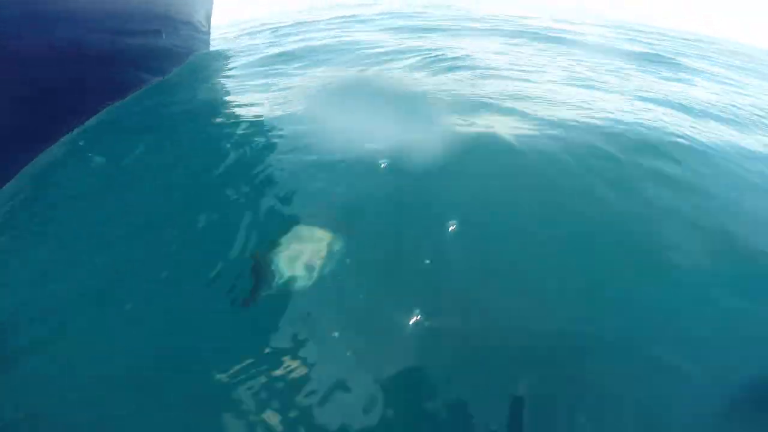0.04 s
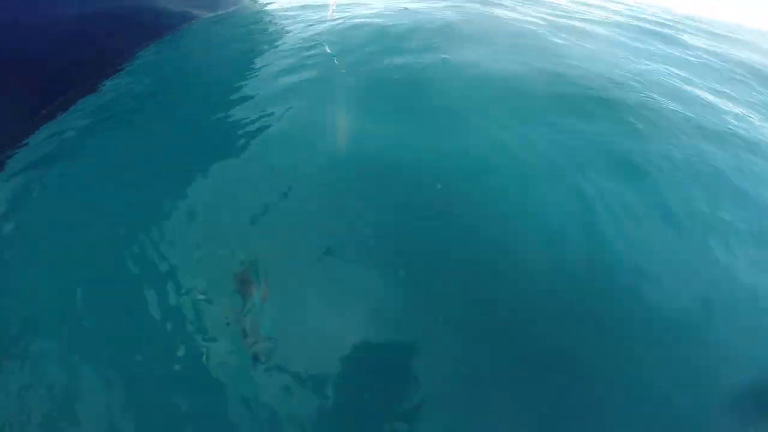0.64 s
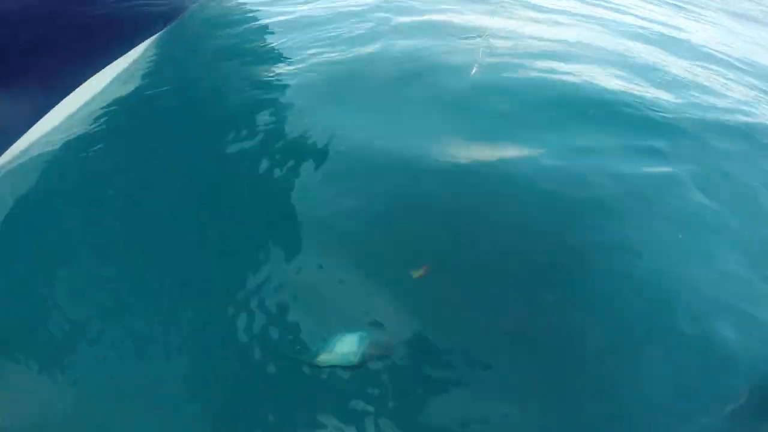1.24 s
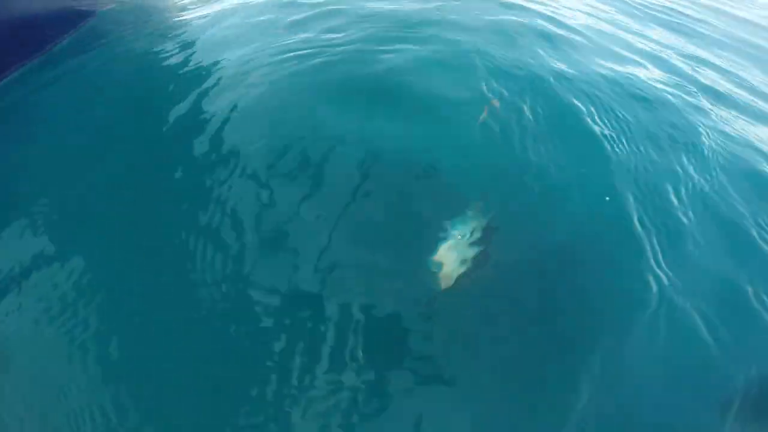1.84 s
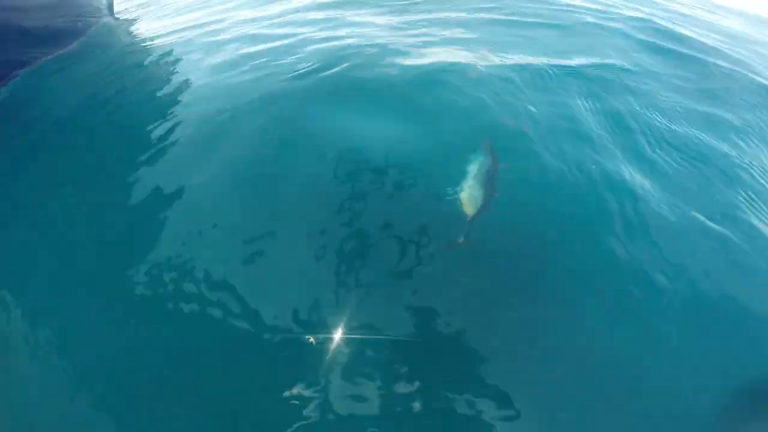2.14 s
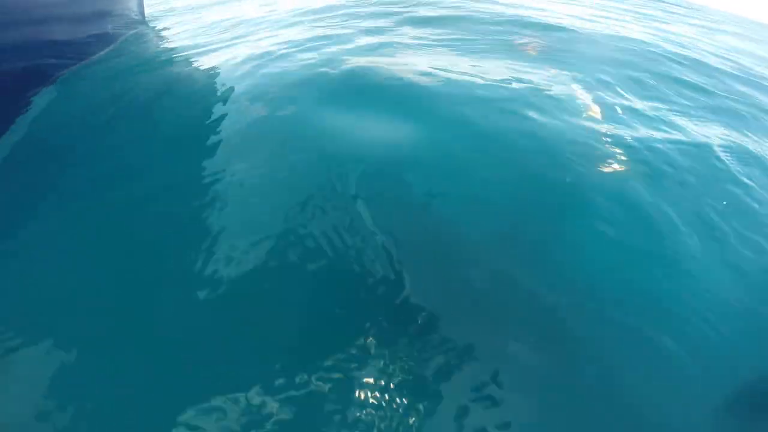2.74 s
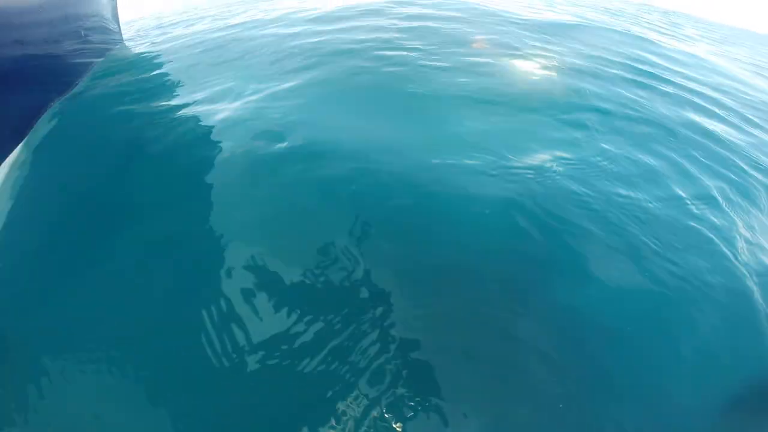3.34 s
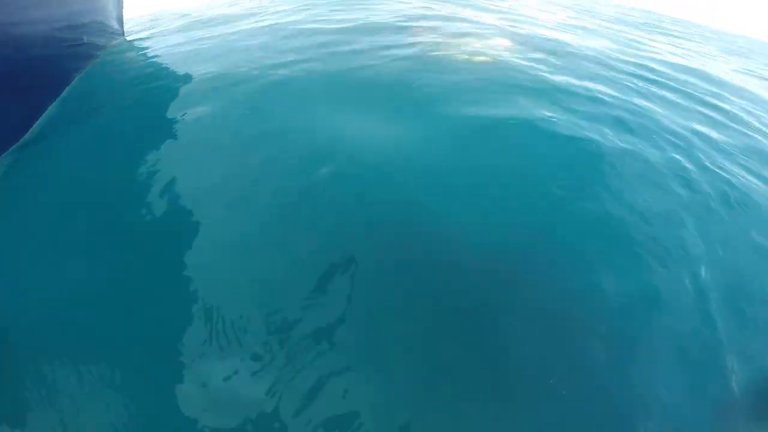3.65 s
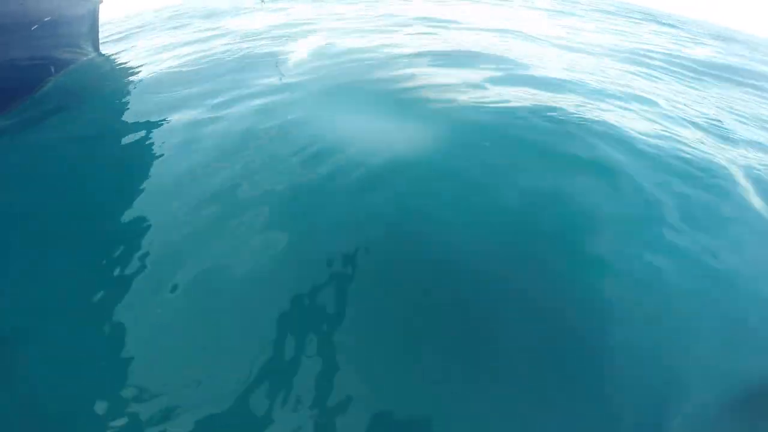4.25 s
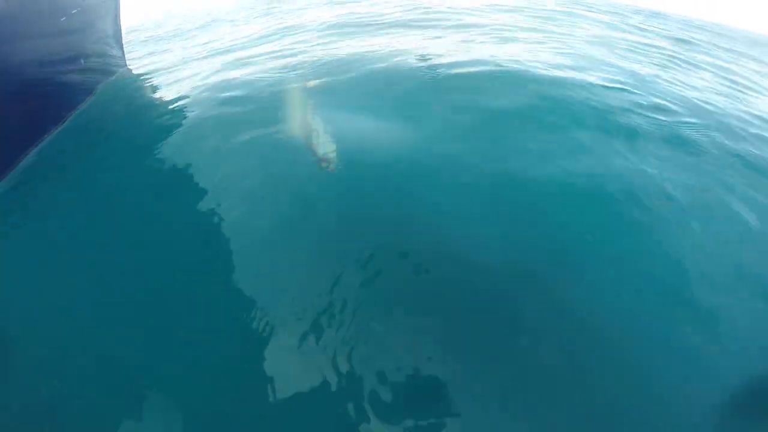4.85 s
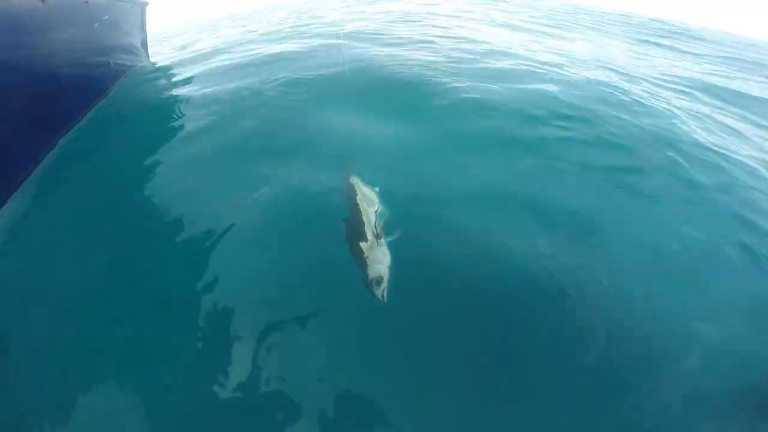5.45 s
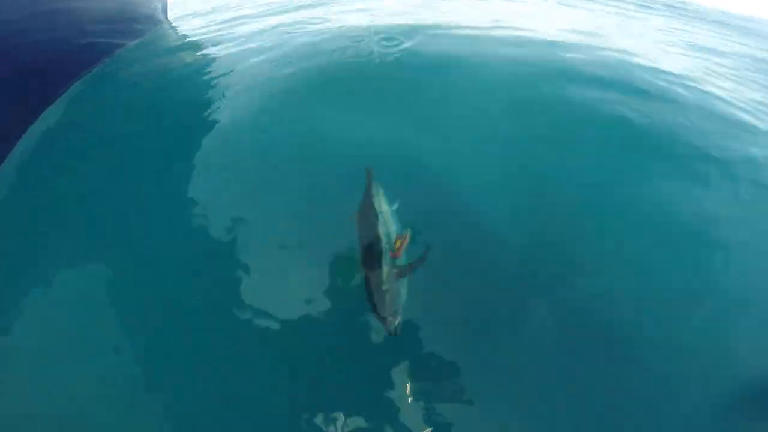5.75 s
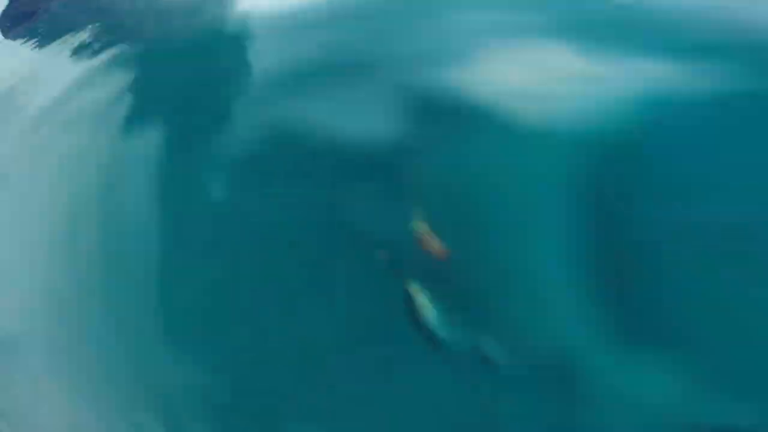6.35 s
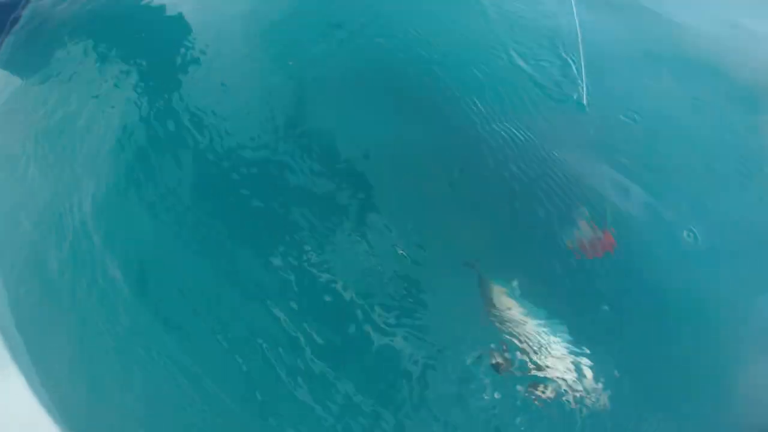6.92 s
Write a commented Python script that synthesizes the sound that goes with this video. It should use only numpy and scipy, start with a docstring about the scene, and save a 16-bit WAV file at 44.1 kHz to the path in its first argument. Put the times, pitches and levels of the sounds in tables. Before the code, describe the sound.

Quiet, muffled water washes against a drifting boat over a low, swelling rumble, with scattered small bubble plips. About a third of the way in, one loud, sharp knock hits the waterproof case around the microphone. The wash carries on, and near the end a fish makes a brief splash, a soft thud with drops ticking on the case. A very faint electronic whine sits underneath.

```python
"""A waterproof camera beside a drifting boat

The camera is held on a pole over the side, where a hooked fish is drawn up. The sea passes through
the case as a dull wash and rumble, with the plips of resonating bubbles; the electronics whine faintly.
One hard knock excites the modes of the mount and makes the gain control duck. Near the end the fish
throws spray, whose drops tick on the case."""
import sys
import numpy as np
from scipy import signal
from scipy.fft import rfft, irfft
from scipy.io import wavfile
from scipy.ndimage import uniform_filter1d, minimum_filter1d

SR = 44100
rng = np.random.default_rng(int(sys.argv[2]) if len(sys.argv) > 2 else 0)


def master_out(mix):
    """Clip the mix to full scale and print it as 16-bit PCM to the path in sys.argv[1]."""
    frames = np.transpose(np.atleast_2d(mix))
    ceiling = np.clip(frames, -1, 1)
    pcm = np.round(ceiling * 32767).astype(np.int16)
    wavfile.write(sys.argv[1], SR, pcm)


N = 312228
TIME = np.arange(N) / SR

# rumble from the slow rocking of boat and pole, with a lull in the middle: t/s, level/dB
SWELL = [(0, -50.5), (2.4, -50), (3.6, -52.5), (4.5, -52.5), (5.4, -46), (6.2, -44.5), (7.08, -46.5)]
# rumble from single waves that heave the pole: crest t/s, level/dB
WAVE_CRESTS = [(.14, -41), (.78, -41.5), (1.17, -44.5), (1.41, -46), (1.83, -41.5), (2.12, -46),
               (2.41, -40.5), (3.4, -47.5), (4.69, -45.5), (5.39, -44)]
# spectral densities of the noises of sea and electronics: f/Hz, relative level/dB
RUMBLE_SPECTRUM = [(8, -15), (18, -10), (32, 1), (43, -8), (53, 0.5), (69, -4), (82, -21), (130, -38)]
SLOSH_SPECTRUM = [(60, -21.5), (95, 1.5), (125, 0.5), (152, -0.5), (200, -9), (300, -14), (600, -35)]
WASH_SPECTRUM = [(80, -5.5), (200, 3), (330, 1.5), (600, -2), (1100, -5.5), (1600, -8), (2100, -9.5),
                 (2800, -10.5), (4200, -15), (6200, -18), (8500, -24), (11800, -25), (13500, -31),
                 (15300, -35.5)]
FIZZ_SPECTRUM = [(4000, -25), (7300, -1.5), (8500, -7), (9200, 4.5), (10200, -12), (12000, -3.5),
                 (15200, -13)]
# partials of the power supply's whine: f/Hz, rms level/dB, wander/Hz
WHINE_PARTIALS = [(2925, -85, 20), (5850, -78, 40), (8781, -83, 4), (11719, -77, 14), (14625, -84, 3)]
# spells of electronic fizz: start t/s, end t/s
FIZZ_SPELLS = [(.003, 0.77), (2.339, 2.55), (3.025, 5.1), (6.735, 7.07)]
# the clearest bubbles at the hull: t/s, level/dB, f/Hz, t60/s
BUBBLES = [(.721, -52, 2650, .027), (.722, -55, 4750, .03), (.789, -47, 4720, .04), (.805, -52, 4240, .04),
           (.808, -50, 2570, .036), (.83, -54.5, 1530, .11), (1.305, -56, 1600, .14),
           (1.491, -44.5, 2380, .021), (1.995, -51.5, 1510, .13), (4.054, -53, 5870, .012),
           (4.055, -50, 3300, .012), (4.565, -55, 1525, .1), (4.689, -40, 2470, 0.027),
           (4.692, -52, 5100, .046), (4.699, -44.5, 2720, .034), (5.222, -40, 148, .13),
           (5.372, -48, 2730, .027), (5.394, -42, 1610, 0.043), (5.446, -54, 4600, .017),
           (5.487, -50, 2410, .027), (5.829, -49.5, 2250, .02), (5.847, -49, 1770, 0.023),
           (5.866, -50, 2400, .015), (6.971, -54, 2760, .2)]
# electronic chirps: t/s, fundamental f/Hz
CHIRPS = [(1.005, 3260), (1.405, 3330), (5.245, 3310), (5.712, 3310)]
# harmonics of a chirp: harmonic number, rms level/dB
CHIRP_HARMONICS = [(1, -78), (2, -71.5), (3, -74.5), (4, -78)]
# the knock and its rebounds: t/s, level/dB
BLOWS = [(2.467, 16), (2.4878, -17), (2.4928, -15), (2.5045, -19)]
# modes of case and pole: f/Hz, relative level/dB, t60/s
MOUNT_MODES = [(51, -23, .24), (64.5, -22.5, .53), (115, -30.5, .6), (126, -19, .11), (161, -21, 0.15),
               (213, -35, .043), (289, -25, .13), (424, -35, .12), (469.8, -31, .12), (583, -22.5, .064),
               (680, -26.5, 0.048), (837, -17, .07), (1031, -9, .041), (1132, -20, .066), (1250, -22, .045),
               (1440, -8, .046), (1600, -15, .024), (1790, -14.5, .028), (1990, -12.5, .022),
               (2334, -24, .03), (2510, -21.5, .028), (2950, -22, .018), (3450, -21, .016)]
# heavily damped modes, the dry crack of the contact: f/Hz, relative level/dB, t60/s
CRACK_MODES = [(1470, 0, .0074), (2100, -12.5, .006), (3600, -17, .0044)]
# crowded small modes of the case, a dying clatter: low f/Hz, high f/Hz, relative level/dB, t60/s
CLATTER_BANDS = [(168.9, 700, -25, .085), (750, 1250, -26, .06), (1250, 2100, -23.5, .036),
                 (2100, 2900, -28.5, .036), (2900, 3700, -32, .026), (3700, 6800, -32.5, .014),
                 (7000, 14000, -30.5, .006)]
# drops striking the case: t/s, tick level/dB, tick f/Hz, tick t60/s, click level/dB
DROPS = [(6.3922, -45, 4000, .005, -44), (6.401, -29.5, 2030, .0068, -37), (6.4053, -34, 6300, .005, -28.5),
         (6.4104, -15.5, 6500, 0.007, -29), (6.4421, -17.5, 11700, 0.0034, -28),
         (6.4678, -26, 6100, .0039, -31), (6.476, -43, 5500, .008, -41), (6.4905, -26.5, 4040, .0068, -31),
         (6.57, -28, 11500, 0.0018, -39.5), (6.5837, -51, 3800, .005, -40), (6.606, -48, 3700, .014, -50)]


def from_db(db):
    """Decibels to amplitude ratio."""
    return 10 ** (np.asarray(db) / 20)


def rms_one(x):
    """Normalisation to rms 1."""
    return x / np.sqrt(np.mean(x ** 2) + 1e-20)


def noise(spectrum):
    """White noise filtered to a given spectral density, rms 1."""
    hz, level_db = np.transpose(spectrum)
    log_hz = np.log(np.maximum(np.fft.rfftfreq(N, 1 / SR), 1))
    shape = from_db(np.interp(log_hz, np.log(hz), level_db, left=-np.inf, right=-np.inf))
    return rms_one(irfft(rfft(rng.standard_normal(N)) * shape, N))


def drift(rate):
    """Random fluctuation of spread about 1, interpolated between `rate` values a second."""
    steps = rng.standard_normal(N // 20)
    return np.interp(TIME * rate, np.arange(len(steps)), steps)


def ring(force, hz, t60):
    """A damped harmonic oscillator: a unit impulse starts a sine of amplitude 1."""
    r, w = from_db(-60 / (t60 * SR)), 2 * np.pi * hz / SR
    return signal.lfilter([0, np.sin(w)], [1, -2 * r * np.cos(w), r * r], force + 1e-18)


def band(x, low_hz, high_hz, order=2):
    """Causal band-pass filter."""
    edges_hz = [low_hz, min(high_hz, SR / 2 - 1)]
    return signal.sosfilt(signal.butter(order, edges_hz, "band", fs=SR, output="sos"), x)


def add(out, s, sound):
    """Superposition of a sound starting at time s."""
    i = round(s * SR)
    out[i:i + len(sound)] += sound[:N - i]


def burst(low_hz, high_hz, t60, order=2):
    """Exponentially decaying band noise, with the energy of a damped sine of amplitude 1."""
    fade = from_db(-60 * TIME[:SR // 8] / t60)
    x = band(rng.choice([-1, 1], len(fade)) * fade, low_hz, high_hz, order=order)
    return x * np.sqrt(np.sum(fade ** 2) / 2 / np.sum(x ** 2))


def sea(rise_s=.11, fall_s=.21, slosh_db=-63, wash_db=-58.5):
    """Swell and waves shake the pole and add in power; slosh and wash on the hull grow a little too."""
    power = from_db(np.interp(TIME, *np.transpose(SWELL))) ** 2
    for s, db in WAVE_CRESTS:
        heave = np.interp(TIME - s, [-rise_s, 0, fall_s], [0, 1, 0])
        power += (from_db(db) * heave) ** 2
    motion_db = 10 * np.log10(power / power.mean())
    rumble = noise(RUMBLE_SPECTRUM)
    rumble /= np.sqrt(uniform_filter1d(rumble ** 2, size=SR // 8))   # the sea alone sets its slow level
    slosh = from_db(slosh_db + .12 * motion_db + 3.5 * drift(27)) * noise(SLOSH_SPECTRUM)
    wash = from_db(wash_db + .08 * motion_db + .5 * drift(12)) * noise(WASH_SPECTRUM)
    return np.sqrt(power) * rumble + slosh + wash


def gurgle(centre_hz=1600, half_width_hz=170, level_db=-77, swing_db=4):
    """A resonance of the case acts as a band-pass filter on faint, fluctuating water noise."""
    resonance = band(rng.standard_normal(N), centre_hz - half_width_hz, centre_hz + half_width_hz)
    return from_db(level_db + swing_db * np.tanh(drift(24))) * rms_one(resonance)


def whine():
    """The power supply oscillates in nearly harmonic partials, each with random frequency modulation."""
    out = np.zeros(N)
    for hz, db, wander_hz in WHINE_PARTIALS:
        phase = 2 * np.pi * np.cumsum(hz + wander_hz * drift(200)) / SR
        out += from_db(db) * np.sqrt(2) * np.sin(phase)
    return out


def fizz(every_s=.141, jitter_s=.008, length_s=.041, level_db=-71, vary_db=1.1, rasp_hz=140, rasp_db=3.5):
    """Under changing load the supply hisses in nearly regular bursts; amplitude modulation adds a rasp."""
    gate, window = np.zeros(N), signal.windows.tukey(int(length_s * SR), .3)
    for start, end in FIZZ_SPELLS:
        for s in np.arange(start, end, every_s):
            late_s, strength_db = rng.standard_normal(2) * [jitter_s, vary_db]
            add(gate, np.clip(s + late_s, 0, TIME[-1]), from_db(strength_db) * window)
    rasp = np.sin(2 * np.pi * rasp_hz * TIME)
    return from_db(level_db + rasp_db * rasp) * gate * noise(FIZZ_SPECTRUM)


def faint_bubbles(per_s=2.5, level_db=-60, low_hz=1480, high_hz=2900, t60_cycles=150):
    """Random small bubbles share one quality factor, so t60 varies as 1/f; rows are as in BUBBLES."""
    when, height = rng.random((100, 2))[:round(per_s * N / SR)].T
    pitches = low_hz * (high_hz / low_hz) ** (height ** 2)   # low ones are commoner
    return [(s, level_db, hz, t60_cycles / hz) for s, hz in zip(when * TIME[-1], pitches)]


def plips(pitch_rise=.036, roughness=.27):
    """Bubbles trapped by wavelets ring as damped oscillators, rising in pitch as they surface."""
    out, t = np.zeros(N), TIME[:SR // 8]
    for s, db, hz, t60 in [*BUBBLES, *faint_bubbles()]:
        age = t / t60
        pitch = hz * (1 + pitch_rise * np.minimum(age, 1))
        bubble = np.sin(2 * np.pi * np.cumsum(pitch) / SR) * from_db(-60 * age)
        froth = 2 * roughness * burst(hz / 1.14, hz * 1.13, t60)
        onset = 1 - np.exp(-age / .074)   # the neck closes gradually
        add(out, s, from_db(db) * (bubble + froth) * onset)
    return out


def chirps(length_s=.08, overshoot=.054, settle_s=.0068, quaver=.0059):
    """A load transient makes the supply chirp: a harmonic tone starts sharp and relaxes to its pitch."""
    out, t = np.zeros(N), TIME[:int(length_s * SR)]
    for s, hz in CHIRPS:
        pitch = hz * (1 + overshoot * np.exp(-t / settle_s) + quaver * drift(310)[:len(t)])
        phase = 2 * np.pi * np.cumsum(pitch) / SR
        tone = sum(from_db(db) * np.sqrt(2) * np.sin(round(k) * phase) for k, db in CHIRP_HARMONICS)
        add(out, s, tone * signal.windows.tukey(len(t), .1))
    return out


def knock(contact_hz=3400, rattle_s=.043, rattle_per_s=900, rattle_db=-9, buzz_db=-24):
    """An impact excites the normal modes of case and pole; the mount's joint rattles briefly after it."""
    force, clatter = np.zeros(N), np.zeros(N)
    for s, db in BLOWS:
        add(force, s, from_db([db]))
        for low_hz, high_hz, band_db, t60 in CLATTER_BANDS:
            add(clatter, s, from_db(db + band_db) * burst(low_hz, high_hz, t60, order=4))
    compliance = signal.butter(4, contact_hz, fs=SR, output="sos")   # plastic gives a little
    force = signal.sosfilt(compliance, force + 1e-18)
    since = TIME - BLOWS[0][0]
    rattling = (since > 0) & (since < rattle_s)
    taps = rattling * (rng.random(N) < rattle_per_s / SR) * rng.choice([-1, 1], N)
    chatter = band(taps / np.sqrt(np.sum(taps ** 2) + 1), 200, 2800, order=4)
    body_drive = force + from_db(rattle_db) * chatter
    crack_drive = force + from_db(buzz_db) * chatter
    body = sum((-1) ** k * from_db(db) * ring(body_drive, hz, t60)
               for k, (hz, db, t60) in enumerate(MOUNT_MODES))
    crack = sum(from_db(db) * ring(crack_drive, hz, t60) for hz, db, t60 in CRACK_MODES)
    return body + crack + clatter


def spray(band_ratio=1.12, sizzle_db=-5, case_db=-9):
    """Brief impacts have broad spectra: each drop clicks, rings the case and ticks at its own pitch."""
    out = np.zeros(N)
    for s, tick_db, hz, t60, click_db in DROPS:
        tick = burst(hz / band_ratio, hz * band_ratio, t60)
        click = burst(1430, 5300, t60=.0072)
        sizzle = from_db(sizzle_db) * burst(10800, 12300, t60=.00092)
        case = from_db(case_db) * burst(1250, 3450, t60=.026)
        add(out, s, from_db(tick_db) * tick + from_db(click_db) * (click + sizzle + case))
    return out


def splash_thud(at_s=6.419, push_db=-29.5):
    """The bulk of the splash thuds, and its impulse sets pole and lid in free vibration."""
    thud, push = np.zeros(N), np.zeros(N)
    add(push, at_s, from_db([push_db]))
    add(thud, at_s, from_db(push_db - 9) * burst(140, 400, t60=.035))
    pole = ring(push, hz=67, t60=.3) - from_db(-9) * ring(push, hz=153, t60=.14)
    lid = from_db(-16) * ring(push, hz=1480, t60=.063)
    return thud + pole + lid


def scene():
    """All sources superpose at one microphone inside the case."""
    background = sea() + gurgle() + whine() + fizz()
    return (background + plips() + chirps() + knock() + spray() + splash_thud())[None]


def record(dry, threshold_db=-7.3, hold_s=.11, release_db_per_s=19, ahead_s=.003, cutoff_hz=15500):
    """Look-ahead gain control ducks, holds and creeps back; peaks saturate and a low-pass cuts the top."""
    power = uniform_filter1d(dry[0] ** 2, size=SR // 300)
    over_db = np.maximum(10 * np.log10(np.maximum(power, 1e-12)) - threshold_db, 0)
    hold = 2 * int(hold_s * SR / 2) + 1
    held_db = -minimum_filter1d(-over_db, hold, origin=hold // 2)   # greatest recent excess
    release_db = release_db_per_s * TIME
    duck_db = np.maximum.accumulate(held_db + release_db) - release_db
    gain = from_db(-np.interp(TIME + ahead_s, TIME, duck_db))
    low_pass = signal.ellip(10, .1, 80, cutoff_hz, fs=SR, output="sos")
    return signal.sosfilt(low_pass, np.clip(dry * gain, -1, 1))


dry = scene()
out = record(dry)
master_out(out)
```